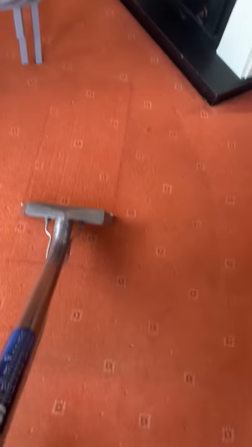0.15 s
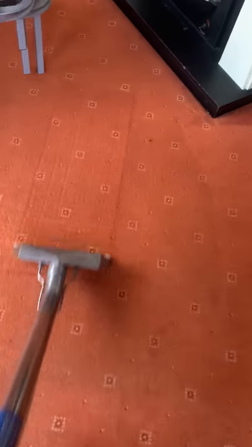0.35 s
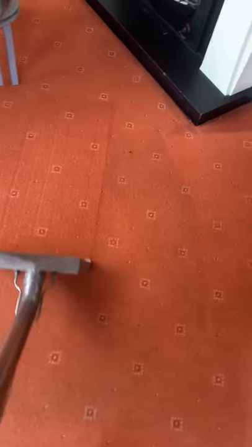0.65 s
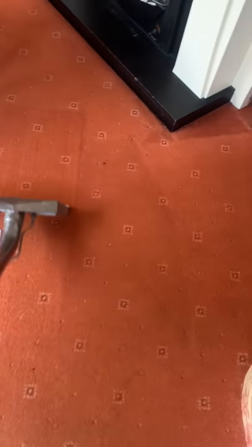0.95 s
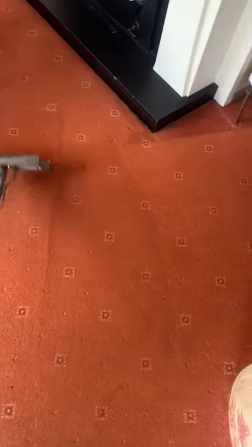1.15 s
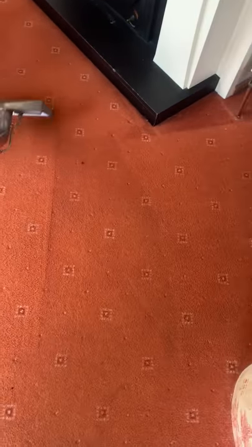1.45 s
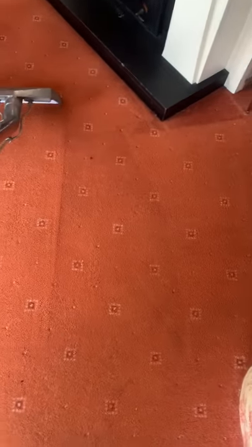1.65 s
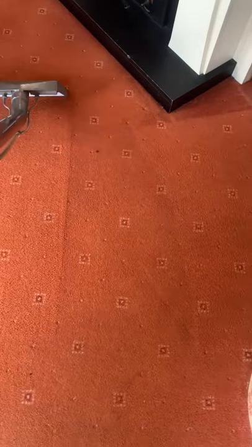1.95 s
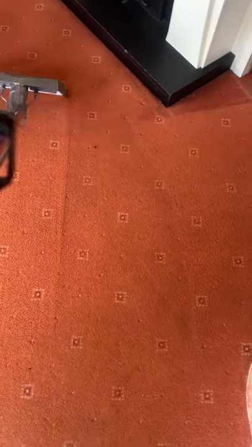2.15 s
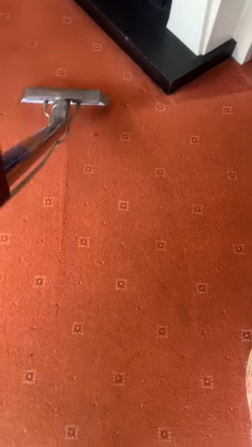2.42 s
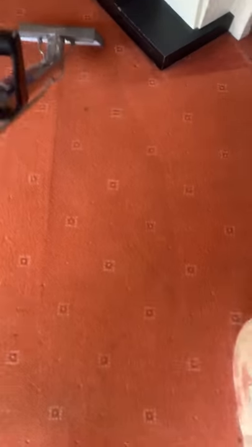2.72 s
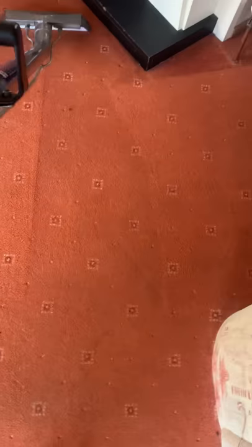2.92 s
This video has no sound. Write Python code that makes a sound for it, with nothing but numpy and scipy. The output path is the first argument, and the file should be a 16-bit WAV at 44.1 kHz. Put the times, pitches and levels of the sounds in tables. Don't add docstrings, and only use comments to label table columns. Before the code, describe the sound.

Wet suction wand roars hollowly over carpet, hose booming low, then briefly slurps up water

```python
import sys
import numpy as np
from scipy import signal
from scipy.fft import rfft, irfft, next_fast_len
from scipy.io import wavfile
from scipy.ndimage import uniform_filter1d, map_coordinates

SR = 44100
rng = np.random.default_rng(int(sys.argv[2]) if len(sys.argv) > 2 else 0)


def dump_mix(stems):
    frames = np.atleast_2d(stems).T
    limited = np.clip(frames, -1, 1)
    pcm = np.round(limited * 32767).astype(np.int16)
    wavfile.write(sys.argv[1], SR, pcm)


def invert_db(x):
    u = np.asarray(x, float) / 20
    return 10 ** u


N = 135828


def unit(x):
    return x / np.sqrt(np.mean(x ** 2) + 1e-20)


def along(points, hz):
    f, v = np.transpose(points)
    return np.interp(np.log(hz + 1), np.log(f + 1), v)


def seconds():
    return np.arange(N) / SR


def curve(rows, axis=1):
    rows = np.transpose(rows)
    return np.interp(seconds(), rows[0], rows[axis])


def wobble(rate_hz):
    return map_coordinates(rng.standard_normal(400), [np.arange(N) * rate_hz / SR])


def filtered(x, response):
    m = next_fast_len(N + 8192)
    return irfft(rfft(x, m) * response(np.fft.rfftfreq(m, 1 / SR)), m)[..., :N]


def coloured(x, colour):
    return filtered(x, lambda hz: invert_db(along(colour, hz)))


def resonant(peaks, share):
    def response(f):
        rings = sum(invert_db(db) * 1j * f * w / (c * c - f * f + 1j * f * w) for c, w, db in peaks)
        return 1 + share * rings
    return response


def patchy(depth_db):
    z = signal.stft(rng.standard_normal((2, N)), nperseg=512)[2]
    field = uniform_filter1d(rng.standard_normal(z.shape[1:]), size=2, axis=0)
    field = uniform_filter1d(field, size=14, axis=1)
    return signal.istft(z * invert_db(depth_db * unit(field)), nperseg=512)[1][:, :N]


# frequency in Hz, share.
QUARTER_CYCLE_TIE = [(330, .85), (600, .75), (860, -0.79), (1460, -.6), (1900, .4), (2500, 0.39),
                     (3900, -.3), (7500, .85)]
# frequency in Hz, share.
IN_PHASE_TIE = [(1000, -.05), (2800, -0.082), (4000, 0.39), (6000, .35), (8000, -0.078)]


def ports(pair, mid_colour, side_colour, side_db):
    def tie(hz):
        lean = np.clip(along(IN_PHASE_TIE, hz), -.45, .45)
        lead = np.clip(along(QUARTER_CYCLE_TIE, hz), -.88, .88)
        free = np.sqrt(1 - lean ** 2 - lead ** 2)
        return np.array([lean + 1j * lead, free])

    mid = unit(coloured(pair[0], mid_colour))
    side = filtered(pair, lambda hz: invert_db(along(side_colour, hz)) * tie(hz)).sum(0)
    side = unit(side) * invert_db(side_db)
    return np.array([mid + side, mid - side])


def room(pair):
    t60_s, wet_db, move_s = .12, -6, .22
    t = np.arange(SR // 4) / SR
    place = seconds() / move_s
    tails = rng.standard_normal((int(place[-1]) + 2, len(t))) * invert_db(-60 * t / t60_s)
    wet = 0
    for k, tail in enumerate(tails):
        fade = np.cos(np.pi / 2 * np.clip(place - k, -1, 1))
        wet = wet + fade * signal.fftconvolve(pair, tail[None], axes=1)[:, :N]
    return unit(pair) + invert_db(wet_db) * unit(wet)


# time in seconds, fourth shaft order in Hz.
FOURTH_ORDER_HZ = [(0, 169.3), (1.5, 169.3), (2.3, 169.8), (3.08, 171.5)]
# shaft multiple, level in dB.
ORDER_LEVEL_DB = [(1, -34), (2, -51.5), (3, -41.5), (4, -41.5), (5, -47.5), (6, -49), (7, -67), (8, -60.5),
                  (9, -62.5), (10, -56)]
# time in seconds, level in dB.
FIRST_ORDER_DB = [(0.0, -41), (0.1, -29), (0.44, -43.5), (0.51, -25.5), (0.8, -45), (0.87, -33.5),
                  (1.42, -29), (1.54, -20), (1.93, -35), (2.02, -26.5), (2.15, -40.5), (3.08, -34)]


def blower():
    turn_rad = 2 * np.pi * np.cumsum(curve(FOURTH_ORDER_HZ) / 4) / SR
    swell_db = curve(FIRST_ORDER_DB) - curve(FIRST_ORDER_DB).mean()
    hum = 0
    for k, db in ORDER_LEVEL_DB:
        level_db = db + 1.6 * wobble(6.99) + swell_db * (k == 1)
        phase_rad = k * turn_rad + 6 * rng.random() + 0.52 * wobble(3.9)
        hum = hum + np.sqrt(2) * invert_db(level_db) * np.sin(phase_rad)
    return hum


# time in seconds, level in dB.
HOSE_LEVEL_DB = [(0, -23), (.18, -23.5), (.24, -31), (.55, -26), (.62, -38), (.69, -27), (1.08, -29),
                 (1.19, -27), (1.36, -28), (1.43, -22.5), (1.68, -26), (1.84, -31), (2.24, -25),
                 (2.46, -29.5), (2.76, -28.5), (2.82, -25), (2.94, -24.5), (3.08, -33.5)]
# frequency in Hz, width in Hz, level in dB.
HOSE_MODES = [(40.3, 8.8, -0.5), (64.7, 15, 2.5)]
# frequency in Hz, level in dB per Hz.
BOOM_COLOUR = [(10, -36.5), (22, -7.5), (36, -6), (60, -2), (120, -8.5), (190, -17.5), (280, -26),
               (480, -31.5), (700, -100)]


def hose():
    lumps = filtered(invert_db(0.57 * wobble(18)) * patchy(3.0)[0], resonant(HOSE_MODES, 0.9))
    boom = unit(coloured(lumps, BOOM_COLOUR))
    steady = int(.07 * SR)
    power = np.abs(uniform_filter1d(uniform_filter1d(boom ** 2, steady), steady))
    return invert_db(curve(HOSE_LEVEL_DB)) * boom / np.sqrt(power + 0.054)


# time in seconds, air flow in dB, lift of the slot off the pile in dB.
AIR_FLOW = [(0, -35.5, -2.5), (.3, -36, -2), (.6, -36.5, 1), (.9, -36.5, 0.5), (1.15, -37, 2),
            (1.4, -37.5, 2.5), (1.65, -37, 0), (1.9, -37.5, 3.6), (2.08, -35.5, -1.5), (2.3, -34.5, -8.5),
            (2.5, -38, 1), (2.75, -37, 0.5), (2.92, -36.5, 3), (3.08, -36, 2.5)]
# frequency in Hz, width in Hz, level in dB.
PIPE_MODES = [(779, 78, 5.5), (1375, 390, -1.5), (2056, 194, 6)]
# frequency in Hz, level in dB per Hz.
SLOT_MID_COLOUR = [(180, -34), (300, 3), (383, -8.5), (524, -12.5), (561, 0), (729, 0), (845, -3),
                   (1390, 1.5), (2400, -7.5), (3120, -23), (5280, -120)]
SLOT_SIDE_COLOUR = [(120, -73), (200, -59.5), (343, -23), (441, -8), (560, -2.5), (608, -5.5), (942, -7),
                    (1020, -3), (2400, -25), (3120, -36), (5280, -120)]
HISS_MID_COLOUR = [(1350, -34), (2300, 2.5), (2440, -6.5), (3050, -9.5), (3920, -7), (4320, -12),
                   (5190, -23), (6080, -31), (7900, -66.5), (13400, -120)]
HISS_SIDE_COLOUR = [(1350, -45), (2300, 0), (2770, -6.5), (3010, -2), (3600, -9), (4780, -16.5),
                    (6080, -33), (7900, -62), (13400, -120)]


def suction():
    lift_hz, hiss_db, hiss_growth = 1070, -10.5, 1.8
    flow_db = curve(AIR_FLOW)
    air = room(filtered(patchy(1.7) * invert_db(.7 * wobble(9)), resonant(PIPE_MODES, 0.72)))
    body = filtered(air, lambda hz: 1 / (1 + (hz / lift_hz) ** 6))
    air = air + (invert_db(curve(AIR_FLOW, axis=2)) - 1) * body
    slot = ports(air, SLOT_MID_COLOUR, SLOT_SIDE_COLOUR, side_db=5.5)
    hiss = room(patchy(2.8) * invert_db(.3 * wobble(18)))
    hiss = ports(hiss, HISS_MID_COLOUR, HISS_SIDE_COLOUR, side_db=4.5)
    mean_db = flow_db.mean()
    hiss_level_db = mean_db + hiss_db + hiss_growth * (flow_db - mean_db)
    return invert_db(flow_db + 0.5) * slot + invert_db(hiss_level_db) * hiss


# start in seconds, length in seconds, level in dB.
SPRAY_BURSTS = [
    (0, 0.2, -77.5),
    (0.502, 0.13, -80),
    (1.483, .09, -79),
    (2.348, .11, -80),
    (2.53, 0.074, -82),
]
# frequency in Hz, level in dB per Hz.
BURST_COLOUR = [(5500, -31), (6500, 1.5), (8000, 4.5), (8800, -22.5), (9900, 1.5), (12100, 3), (12600, -35),
                (13700, -35), (14200, 0), (15600, -7)]
DROP_COLOUR = [(5000, -37), (7000, 3), (15500, 1)]
FAR_AIR_COLOUR = [(5500, -20.5), (6300, -8), (7500, -4), (8500, -16.5), (9000, -32), (9900, -17),
                  (11000, -11), (12200, -23), (12500, -47.5), (13700, -46), (14200, -28.5), (15500, -31)]


def spray():
    tick_db, tick_s, ramp_s, far_air_db = 6, .003, .004, -84.5
    t = seconds()
    on, ticks = 0, 0
    for start_s, length_s, db in SPRAY_BURSTS:
        inside_s = np.minimum(t - start_s + ramp_s, start_s + length_s - t)
        on = on + invert_db(db) * np.clip(inside_s / ramp_s, 0, 1)
        ticks = ticks + invert_db(db + tick_db) * np.exp(-((t - start_s) / tick_s) ** 2)
    drops = ticks * ports(patchy(0.74), DROP_COLOUR, DROP_COLOUR, 0.93)
    mist = on * ports(patchy(1.2), BURST_COLOUR, BURST_COLOUR, 1.6)
    far_air = invert_db(far_air_db) * ports(patchy(3.4), FAR_AIR_COLOUR, FAR_AIR_COLOUR, 1.2)
    return drops + mist + far_air


def bubbles(count):
    centre_hz, ring_cycles, rise_s = 756, 8.2, 0.018
    draw = rng.standard_normal((count, 3))
    t = np.arange(2600) / SR
    start = (rng.random(count) * (N - len(t))).astype(int)
    hz = centre_hz * np.exp(0.41 * draw[:, :1])
    decay = np.exp(-3.5 * hz * t / ring_cycles)
    rings = invert_db(1.8 * draw[:, 1:2]) * np.sin(2 * np.pi * hz * t) * decay * (1 - np.exp(-t / rise_s))
    spot = start[:, None] + np.arange(len(t)) + N * (draw[:, 2:] > 0)
    return unit(np.bincount(spot.ravel(), rings.ravel(), 2 * N).reshape(2, N))


# time in seconds, level in dB.
WATER_FLOW_DB = [
    (2.08, -43.5),
    (2.115, -27),
    (2.15, -26),
    (2.21, -28),
    (2.27, -30),
    (2.33, -32),
    (2.385, -28),
    (2.41, -38),
    (2.47, -41.5),
]
# frequency in Hz, width in Hz, level in dB.
SLUG_MODES = [(450, 90, -3), (600, 60, -2), (700, 120, -4), (849.4, 14, 3), (1167, 40, 4)]
# frequency in Hz, level in dB per Hz.
FRONT_MID_COLOUR = [(120, -34), (200, -25), (330, -13.5), (854, -4.5), (1030, -59.5), (1200, -2),
                    (1410, -13), (2220, -10), (6000, -45.5), (7800, -64), (13200, -120)]
FRONT_SIDE_COLOUR = [(150, -79), (250, -45), (414, -56), (461, -6.5), (1020, -10), (1150, -12), (1450, -27),
                     (2560, -20), (6000, -51.5), (7800, -80), (13200, -120)]
TAIL_MID_COLOUR = [(90, -32), (160, -15.5), (300, 5), (500, -5.5), (630, 7), (1000, -13), (1500, -42),
                   (2600, -65), (4400, -120)]
TAIL_SIDE_COLOUR = [(150, -84), (250, -35), (440, -1), (552, 2.5), (980, 2), (1620, -28.5), (2000, -17.5),
                    (2600, -58), (4400, -120)]


def gulp():
    turn_s, turn_length_s, front_side_db, bubbles_db = 2.19, 0.05, 6.5, -6.5
    t = seconds()
    enter = np.clip((t - WATER_FLOW_DB[0][0]) / .02, 0, 1)
    leave = np.clip((WATER_FLOW_DB[-1][0] - t) / .03, 0, 1)
    late = np.pi / 2 * np.clip((t - turn_s) / turn_length_s, 0, 1) ** 2
    churn = invert_db(1.5 * wobble(55))
    front = filtered(patchy(1.5), resonant(SLUG_MODES, 1.5))
    front = ports(front, FRONT_MID_COLOUR, FRONT_SIDE_COLOUR, front_side_db)
    tail = ports(patchy(1.8), TAIL_MID_COLOUR, TAIL_SIDE_COLOUR, side_db=5)
    pockets = ports(bubbles(count=1500), [(250, 0)], [(250, -25), (450, 18.5)], front_side_db)
    water = np.cos(late) * front + np.sin(late) * tail
    return enter * leave * invert_db(curve(WATER_FLOW_DB)) * (churn * water + invert_db(bubbles_db - 0.5) * pockets)


# frequency in Hz, width in Hz, level in dB.
SPLASH_MODES = [(1180, 70, 3.5), (1770, 200, 8), (2450, 230, 2)]
# frequency in Hz, level in dB per Hz.
SPLASH_COLOUR = [(800, -30), (1200, 0), (2500, -4), (3100, -15), (4300, -13), (5500, -33), (7000, -54),
                 (9000, -95)]


def splash():
    level_db, start_s, fade_s, rise_s = -31.5, 2.088, .06, .025
    since_s = np.maximum(seconds() - start_s, 0)
    shape = np.exp(-since_s / fade_s) * (1 - np.exp(-(since_s / rise_s) ** 2))
    spatter = filtered(patchy(1.7), resonant(SPLASH_MODES, 0.92))
    spatter = ports(spatter, SPLASH_COLOUR, SPLASH_COLOUR, 2.2)
    return invert_db(level_db + 1.6 * wobble(67)) * shape * spatter


# start in seconds, level in dB, frequency in Hz, 60 dB decay in seconds.
KNOCK = (2.385, -29, 150, .06)


def thud():
    start_s, db, hz, t60_s = KNOCK
    t = np.maximum(seconds() - start_s, 0)
    rise = 1 - np.exp(-t / .012)
    return invert_db(db - 60 * t / t60_s) * rise * np.sin(2 * np.pi * hz * t) * 4


def scene():
    return blower() + hose() + suction() + spray() + gulp() + splash() + thud()


def band_limit(x):
    return signal.sosfilt(signal.butter(12, 15400, fs=SR, output="sos"), x)


def record(dry):
    mix = dry * np.clip(np.arange(N) / 100, 0, 1)
    return band_limit(mix)


dry = scene()
out = record(dry)
dump_mix(out)
```